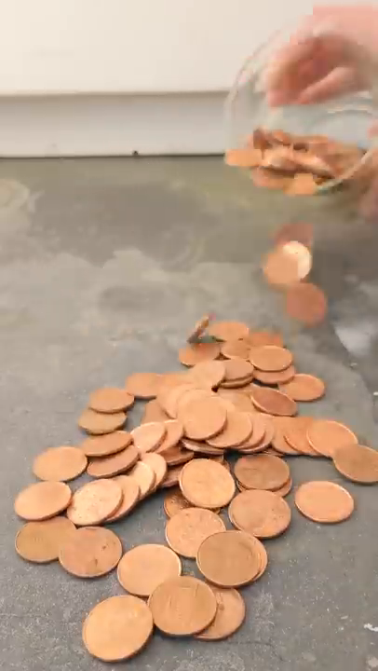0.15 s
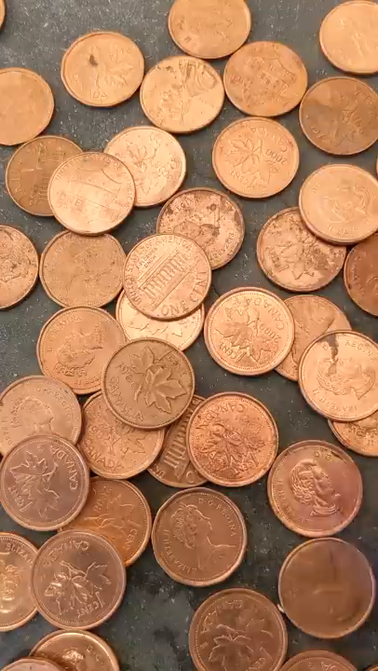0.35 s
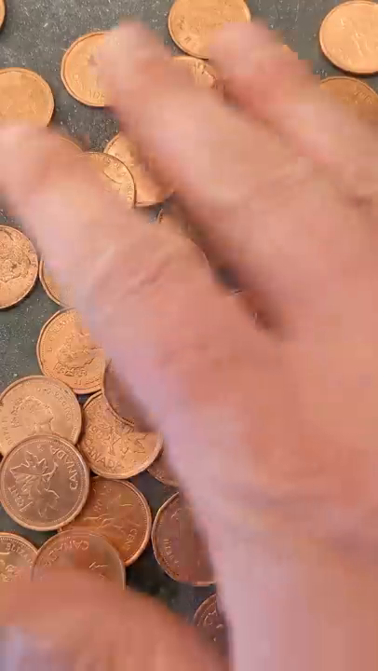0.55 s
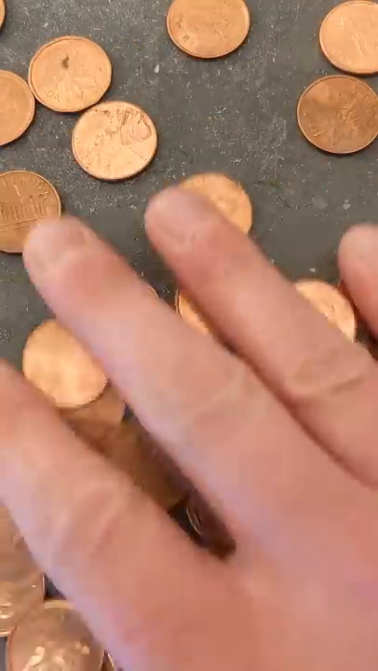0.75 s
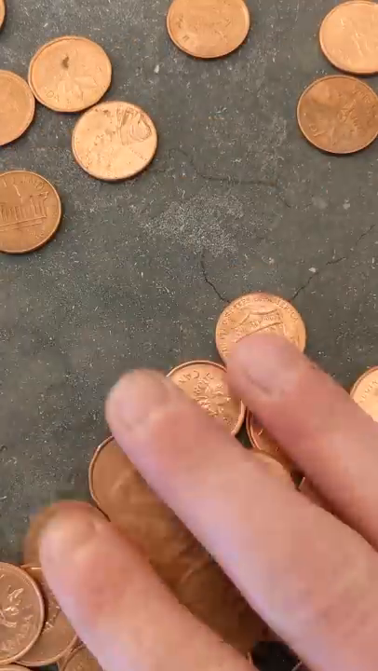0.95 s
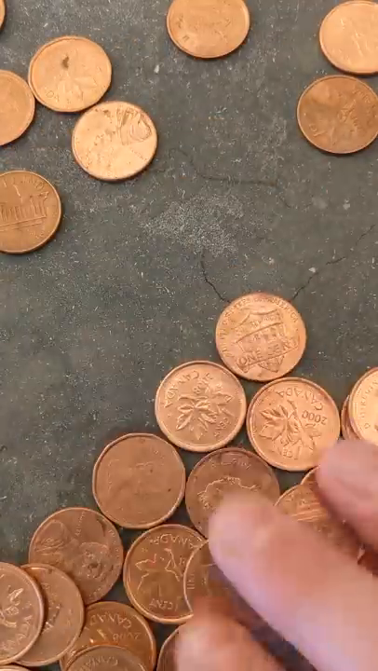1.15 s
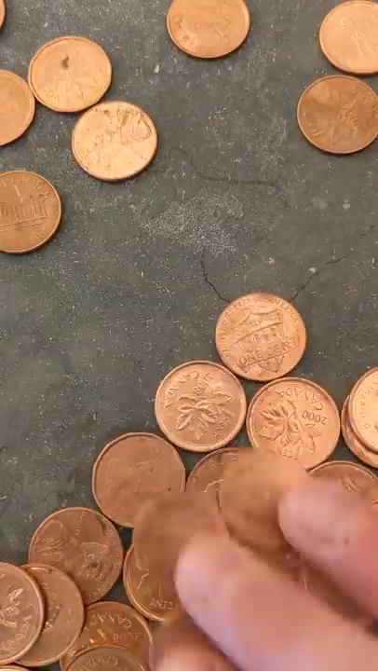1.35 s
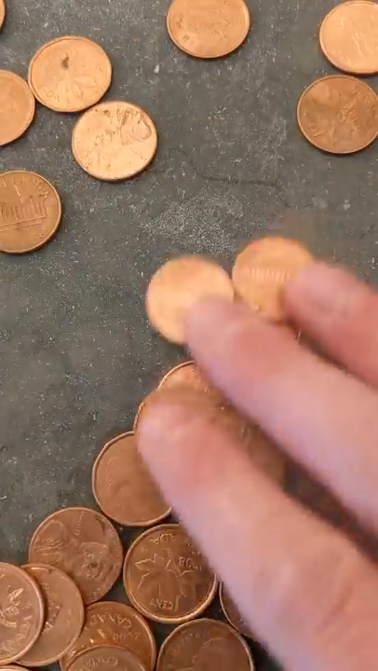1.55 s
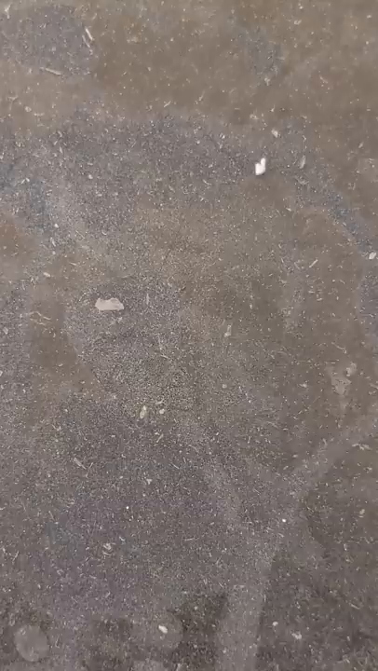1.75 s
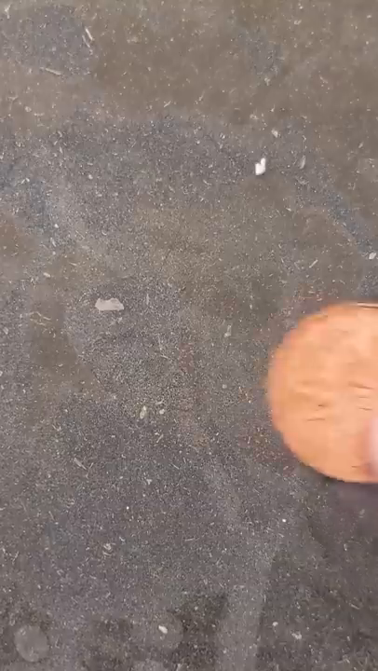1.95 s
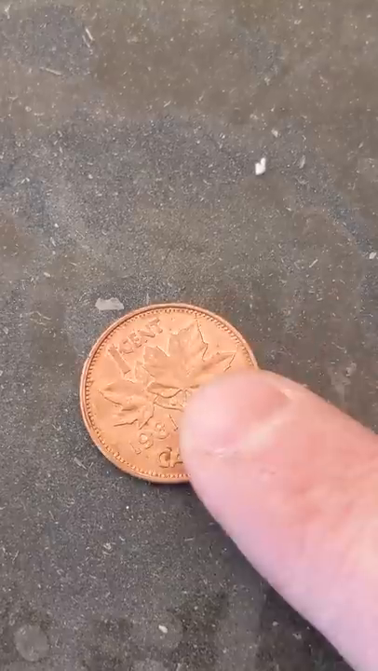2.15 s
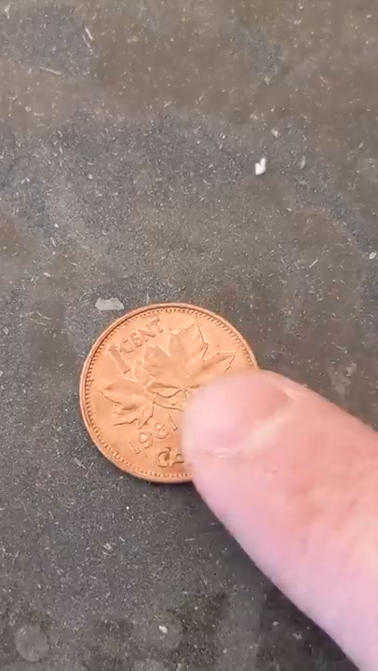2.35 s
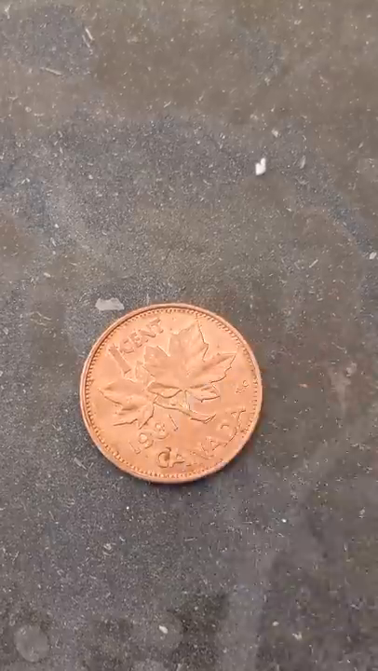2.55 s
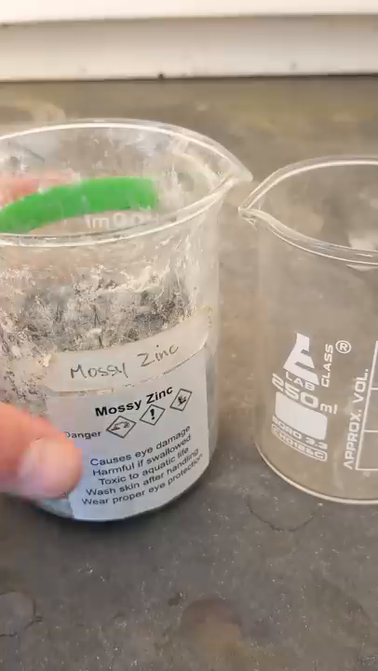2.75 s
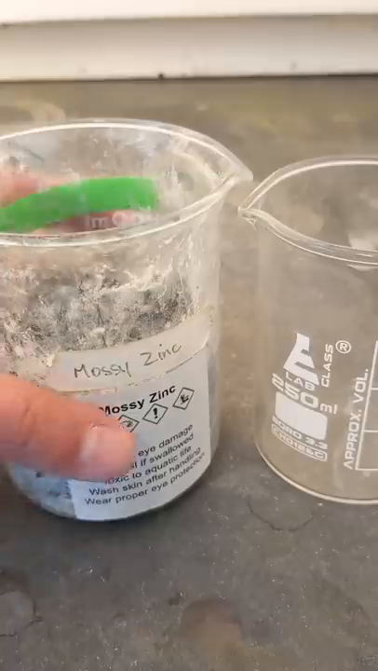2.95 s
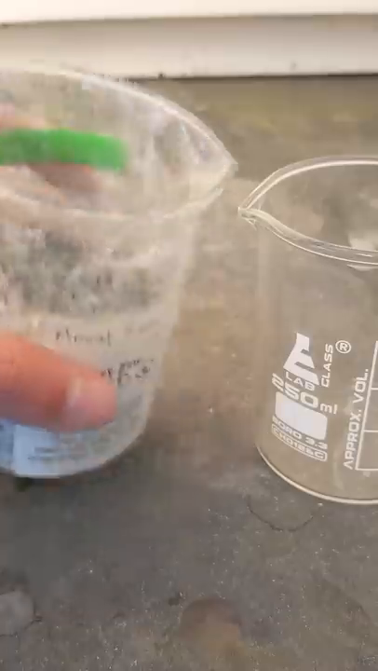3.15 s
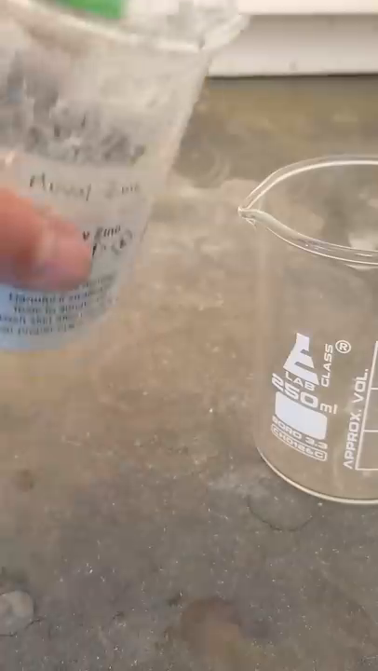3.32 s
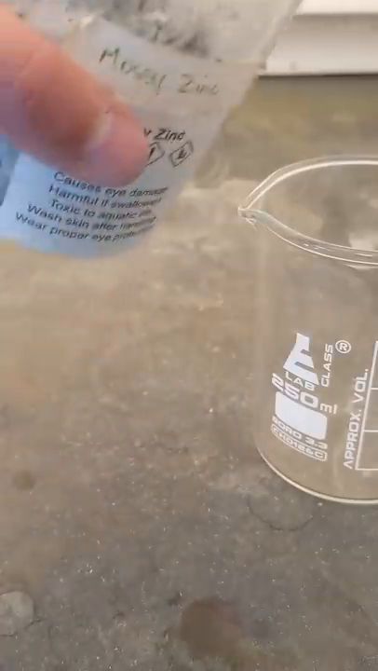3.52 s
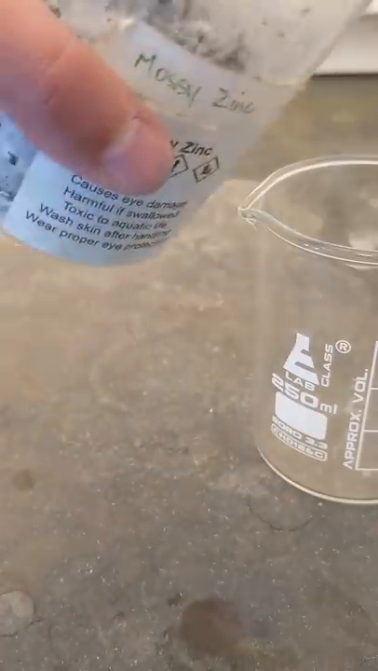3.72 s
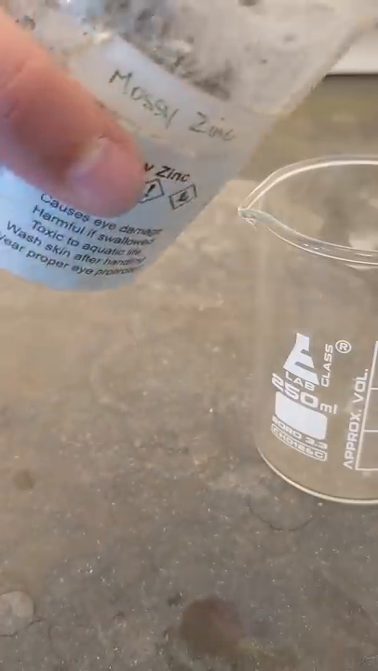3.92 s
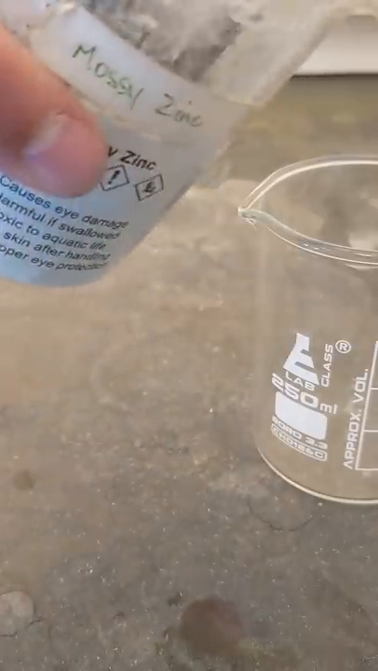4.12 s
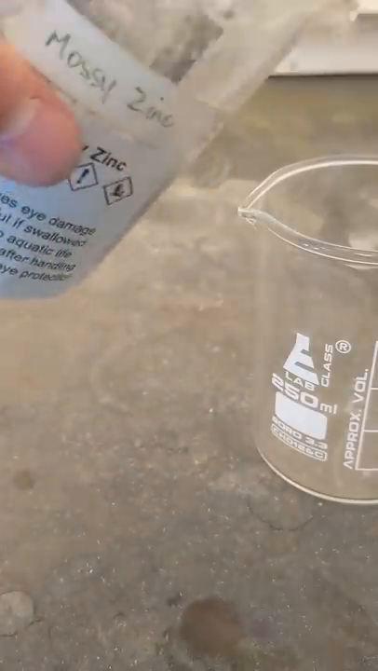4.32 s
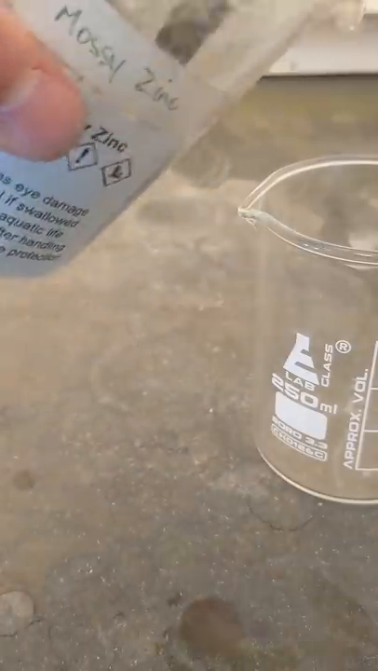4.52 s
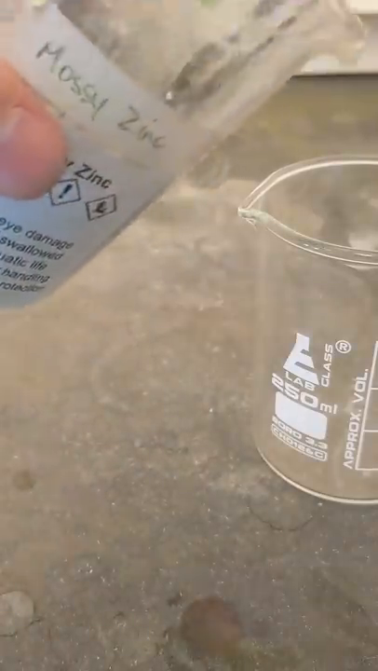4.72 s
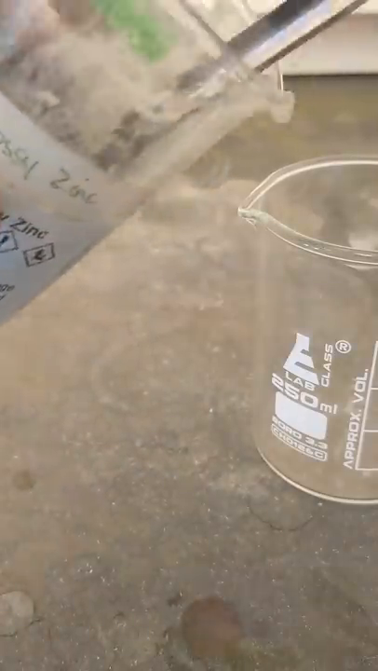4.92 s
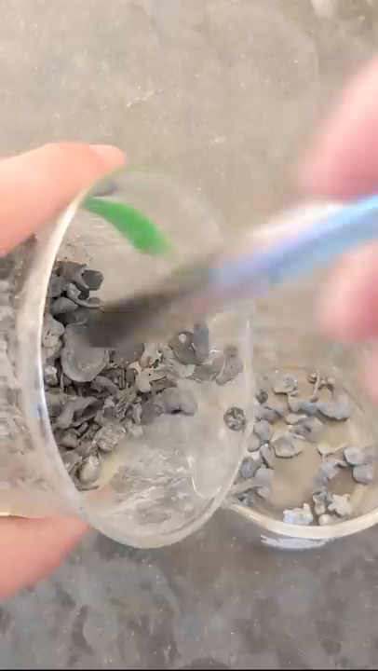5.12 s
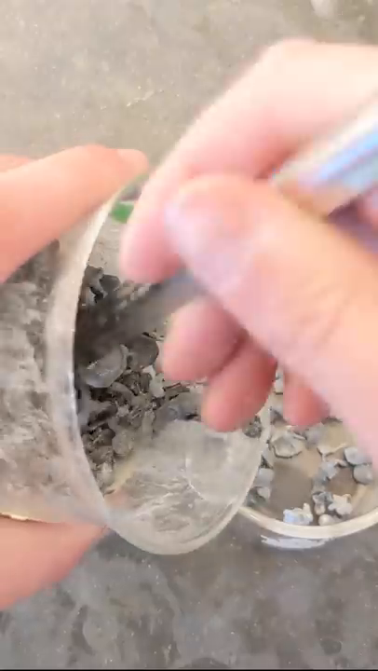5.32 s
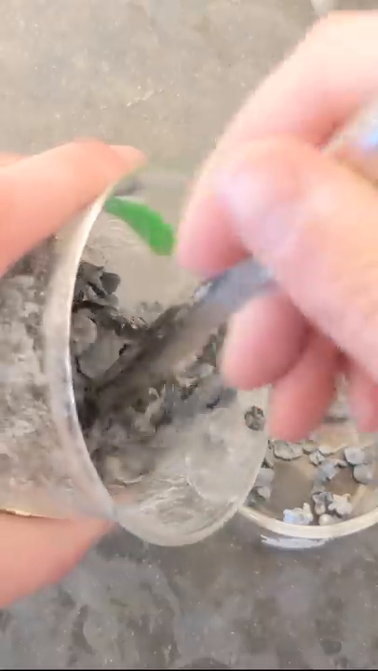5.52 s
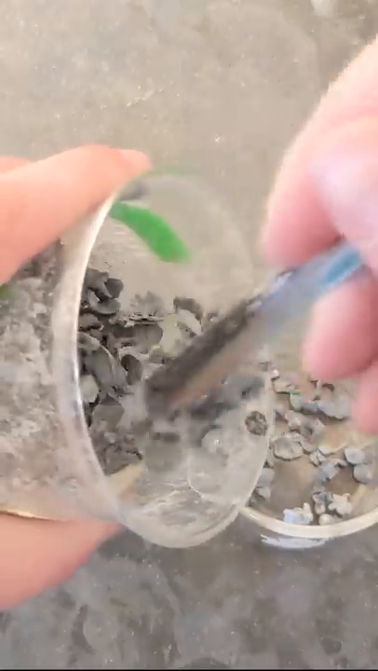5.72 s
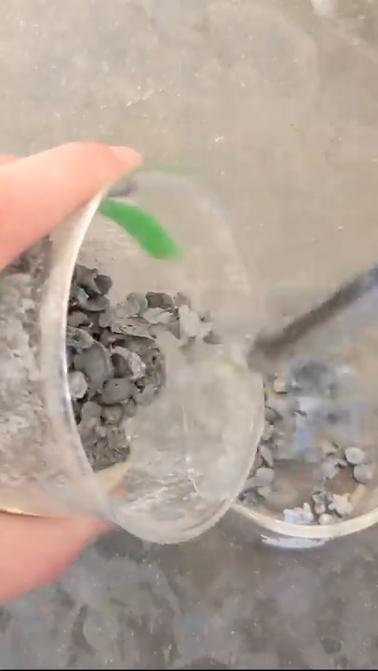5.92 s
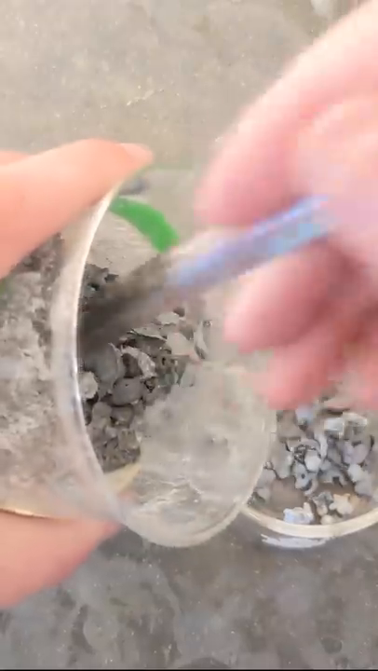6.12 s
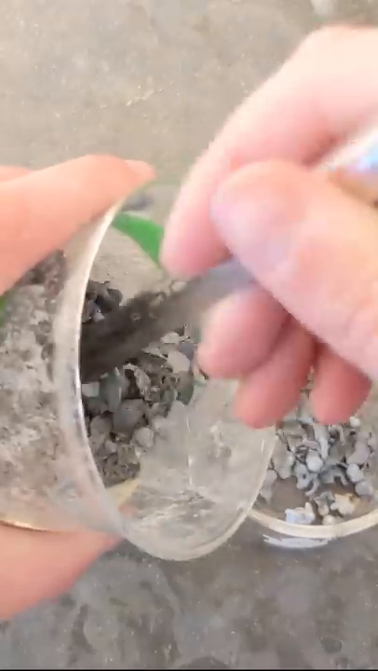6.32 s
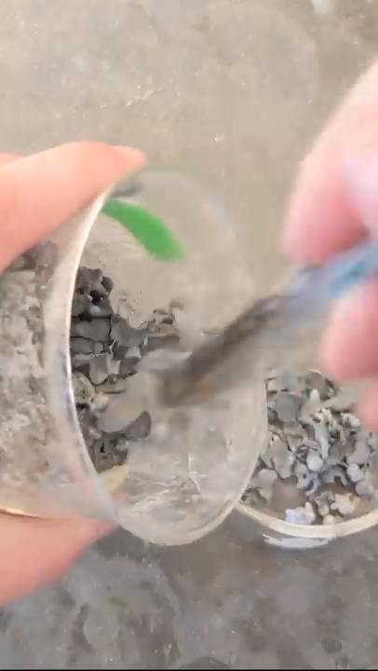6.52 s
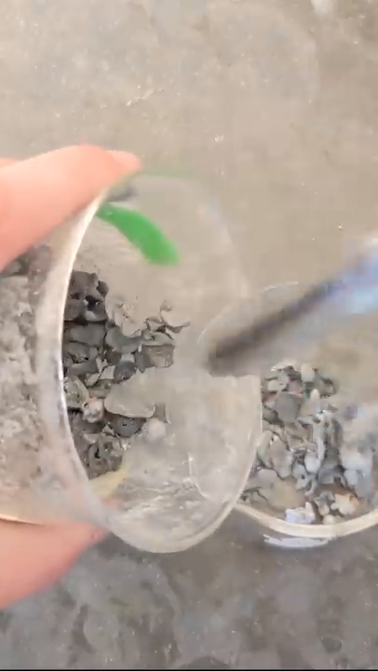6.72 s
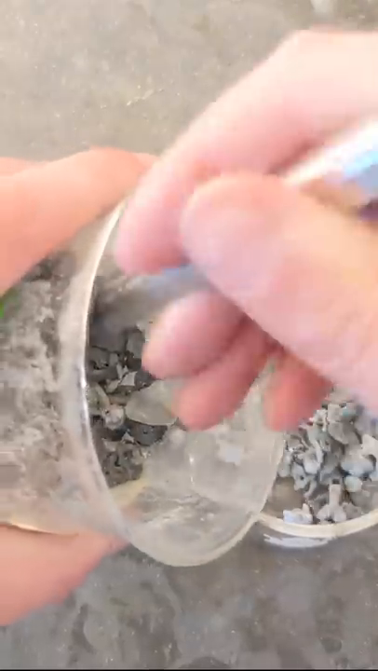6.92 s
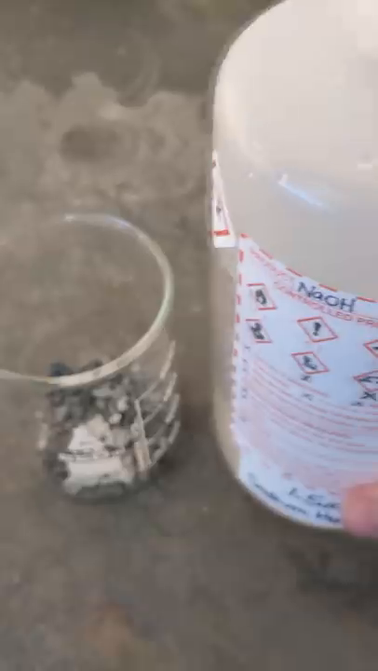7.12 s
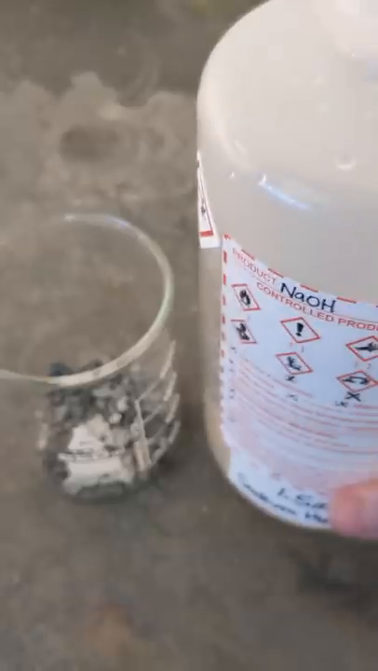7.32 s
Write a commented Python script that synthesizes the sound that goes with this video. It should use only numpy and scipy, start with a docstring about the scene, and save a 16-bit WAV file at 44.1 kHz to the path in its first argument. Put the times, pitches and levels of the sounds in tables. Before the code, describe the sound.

Copper coins spill out of a glass jar onto concrete in a loud, bright jingle, then stop dead. A hand rakes the heap, sweeps back with sharper clinks, and softly slides one coin. A beaker of metal flakes is lifted and tilted with sparse ticks; a spatula then scrapes flakes into a second beaker, which rings brightly. Close stereo microphones, small humming room.

```python
"""Coins and zinc flakes, close up

Copper coins pour from a glass jar onto concrete; a hand rakes and sweeps the heap and slides one coin aside.
A beaker of zinc flakes is lifted and tilted, and a steel spatula scrapes flakes into a second, ringing beaker.
Then fingers touch a plastic bottle. Two close microphones hear it in a small humming room; the heap is silent
for a moment after the pour, and heap and glassware each break off abruptly.
Contacts are bursts and grains of filtered noise; free coins and glass are decaying sines."""
import sys
import numpy as np
from scipy import signal
from scipy.fft import rfft, irfft, next_fast_len
from scipy.io import wavfile
from scipy.ndimage import uniform_filter1d

SR = 44100
rng = np.random.default_rng(int(sys.argv[2]) if len(sys.argv) > 2 else 0)


def generate_wav(sig):
    """Save sig (samples, or channels by samples) to the path in sys.argv[1] as 16-bit PCM at SR."""
    pcm = np.round(np.clip(np.atleast_2d(sig).T, -1, 1) * 32767).astype(np.int16)
    wavfile.write(sys.argv[1], SR, pcm)


N = 329427  # samples

# All table levels are relative: each source trims them further.
# Colour of swept and clinking coins: [f/Hz, density/dB per Hz]
SWEPT = [(1470, -39.5), (2500, -12.5), (4440, -9), (6350, -2), (8870, -1.5), (10200, -6.5), (11700, -11.5),
         (13100, -7), (14900, -10), (16000, -13)]
# Colour of the concrete under the coins: [f/Hz, density/dB per Hz]
CONCRETE = [(110, -36), (180, -10.5), (231, -9.5), (389, -2.5), (435, -8), (600, -4), (705, -5), (1490, -3),
            (1790, -4), (3500, -10), (4550, -38.5), (7700, -120)]
# The spatula taps the wall of the held beaker: [t/s, level/dB]
TAPS = [(5.052, -31), (5.336, -27), (5.604, -29)]


def amp(db):
    """Decibels to gain."""
    return 10 ** (np.asarray(db) / 20)


def unit(x):
    """Scale to rms 1."""
    return x / np.sqrt(np.mean(x ** 2) + 1e-20)


def along(points, hz):
    """(Hz, value) points read on a log frequency axis."""
    f, v = np.transpose(points)
    return np.interp(np.log(hz + 1), np.log(f + 1), v)


def add(track, s, sound):
    """Mix a sound into a track at a time in seconds."""
    start = max(round(s * SR), 0)
    track[..., start:start + sound.shape[-1]] += sound[..., :N - start]


def colour(x, spectrum, size=8192):
    """Causal minimum-phase filter of unit power with the given spectrum."""
    gain = unit(amp(along(spectrum, np.fft.rfftfreq(size, 1 / SR))))
    # folding the cepstrum forward in time puts the response as early as possible
    cepstrum = irfft(np.log(np.maximum(gain, 1e-6)))
    cepstrum[1:size // 2] *= 2
    cepstrum[size // 2 + 1:] = 0
    response = irfft(np.exp(rfft(cepstrum)))
    return signal.fftconvolve(x, response[None], axes=1)[:, :N]


def band(x, hz, sharpness):
    """A resonance applied twice, scaled to keep the energy."""
    b, a = signal.iirpeak(min(hz, SR / 2.2), sharpness, SR)
    y = signal.lfilter(b, a, signal.lfilter(b, a, x))
    return y * np.linalg.norm(x) / np.linalg.norm(y)


def pair(size, apart):
    """Noise for two microphones: a shared part plus a part of their own."""
    shared = rng.standard_normal(size)
    return unit(shared + apart * rng.standard_normal((2, size)))


def sides(db):
    """Left and right gains for a left-minus-right level."""
    return amp([[db / 2], [-db / 2]])


def grains(size, rate, spread_db):
    """Tiny contacts at random times (rate per second), of uneven force; slow swings in power are evened out."""
    struck = rng.random(size) < rate / SR
    force = struck * amp(spread_db * np.minimum(rng.exponential(size=size), 4))
    fade = np.exp(-1 / (0.00042 * SR))  # each contact's power dies away in 0.42 ms
    power = signal.lfilter([1], [1, -fade], force ** 2) + 0.057  # with a steady floor
    slow_power = np.abs(uniform_filter1d(power, SR // 30))
    return np.sqrt(power / slow_power) * pair(size, apart=4)


def room(x, wet_db, shared_hz):
    """Direct sound plus a short tail from the walls; the two close microphones share the bass."""
    # [f/Hz, t60/s]
    wall_decay = [(200, 0.32), (1000, 0.17), (5000, 0.18), (14000, 0.16)]
    hz, t, z = signal.stft(rng.standard_normal((2, SR // 3)), SR, nperseg=256)
    fading = z * amp(-60 * t / along(wall_decay, hz)[:, None])
    tail = signal.istft(fading, SR, nperseg=256)[1]
    tail[:, :SR // 250] = 0  # the walls answer after 4 ms
    echo = signal.fftconvolve(x, tail / np.linalg.norm(tail[0]), axes=1)[:, :N]
    left, right = x + amp(wet_db) * sides(-1) * echo
    side = signal.filtfilt(*signal.butter(1, shared_hz, "high", fs=SR), left - right)
    return np.array([left + right + side, left + right - side]) / 2


def until(s, fade):
    """Gain that falls to nothing at time s, over the last fade seconds."""
    return np.clip((s - np.arange(N) / SR) / fade, 0, 1) ** 2


def decay(t60):
    """Half a second of exponential decay."""
    return amp(-60 * np.arange(SR // 2) / SR / max(t60, .001))


def ring(hz, t60):
    """One struck mode; the higher it is, the more its phase differs between the microphones."""
    t = np.arange(SR // 2) / SR
    phase = rng.random() + min(hz / 12000, .6) * rng.random((2, 1))  # in cycles
    onset = 1 - np.exp(-t / 0.00042)
    return decay(t60) * onset * np.sin(2 * np.pi * (hz * t + phase))


def resonate(x, modes):
    """A glass wall driven by the contacts in x."""
    response = sum(amp(db) * ring(hz, t60) for hz, db, t60 in modes)
    return signal.fftconvolve(x, response, axes=1)[:, :N]


def strokes(rows, attack_s, release_s):
    """Each stroke sets in, holds while its force drifts, and dies away; one gain track per level column."""
    out = np.zeros((len(rows[0]) - 3, N))
    for s, length, rise_db, *column_db in rows:
        t = np.arange(int((length + release_s) * SR)) / SR
        attack = np.minimum(t / attack_s, 1)
        hold_db = rise_db * (np.minimum(t / length, 1) - .5)
        release_db = -60 * np.maximum(t - length, 0) / release_s
        add(out, s, amp(column_db)[:, None] * attack * amp(hold_db + release_db))
    return out


def background():
    """Ventilation rumble is coloured noise, mains and motor hum are sines, a low drone is noise near 80 Hz."""
    # Rumble colour: [f/Hz, density/dB per Hz]
    rumble_colour = [(13, -57), (22, -31.5), (43, -6.5), (122, -6.5), (217, -19), (249, -21), (286, -17),
                     (387, -27), (420, -31), (457, -23), (636, -34.5), (961, -34.5), (1130, -41.5),
                     (8260, -50), (16000, -68)]
    # Mains and motor: [f/Hz, level/dB]
    hum_tones = [(59.2, -53), (118.4, -54.5), (209.9, -77.5)]
    # Drone: [t/s, length/s, rise/dB, level/dB]
    drone_strokes = [(5.05, 1.6, -1, -52.5), (6.66, 0.58, 5, -48)]
    t = np.arange(N) / SR
    rumble = amp(-54) * colour(pair(N, apart=0.4), rumble_colour)
    hum = sum(amp(db) * np.sqrt(2) * np.sin(2 * np.pi * (hz * t + rng.random())) for hz, db in hum_tones)
    swell = strokes(drone_strokes, attack_s=0.05, release_s=.6)
    drone = amp(1) * swell * band(pair(N, apart=0.058), 80, sharpness=6)
    return sides(-1) * (rumble + amp(-3.5) * hum + drone)


def sliding(gains, spectrum, rate, spread_db, clatter_db, grind_db):
    """Coins jostle each other (bright grains) and grind over the concrete (dull grains)."""
    clatter, grind = gains
    bright = colour(clatter * grains(N, rate, spread_db), spectrum)
    dull = colour(grind * grains(N, rate=2500, spread_db=3.5), CONCRETE)
    return amp(clatter_db) * bright + amp(grind_db) * dull


def jingle(rows, lo_hz, hi_hz, t60, count):
    """Tumbling coins ring briefly, each at a pitch of its own, mostly high."""
    out = np.zeros((2, N))
    span = [rows[0][0], rows[-1][0] + rows[-1][1]]
    for when, pitch, size in rng.random((count, 3)):
        hz = lo_hz * (hi_hz / lo_hz) ** np.sqrt(pitch)
        add(out, np.interp(when, [0, 1], span), amp(-12 * size) * ring(hz, t60))
    return out


def pour():
    """Coins tumble out in grains and short rings, and weakly drive the modes of the glass jar."""
    # [t/s, length/s, rise/dB, clatter level/dB, grind level/dB]
    pour_strokes = [(-0.01, .235, -8, -23.5, -32), (.236, .05, -17.5, -25.5, -29)]
    # [f/Hz, density/dB per Hz]
    pour_colour = [(1470, -36.5), (2500, -12.5), (2700, -11), (4410, -1), (4910, -2), (11400, -0.5),
                   (13100, -6.5), (14200, -1), (16000, -18.5)]
    # Jar modes: [f/Hz, level/dB, t60/s]
    jar_modes = [(6303, -1, .12), (7892, 0.5, .12), (10072, 1.5, .1)]
    flow = strokes(pour_strokes, attack_s=.004, release_s=.06)
    out = sliding(flow, pour_colour, rate=700, spread_db=-1.0, clatter_db=-2.5, grind_db=1.0)
    out += amp(-2.5) * flow[0] * jingle(pour_strokes, lo_hz=1302, hi_hz=14640, t60=0.024, count=90)
    return out + amp(-40.5) * resonate(out, jar_modes)


def coin_hits():
    """Heaped coins damp each other to sharp ticks; a free one rings at its lowest plate mode."""
    # Coin on coin: [t/s, peak level/dB]
    clinks = [(0.0329, -14), (0.0747, -8.5), (0.099, -13), (0.2403, -11), (0.2429, -6.5), (0.2503, -14.5),
              (0.6787, -32), (0.7048, -25.5), (0.781, -20), (0.9175, -33), (1.0514, -18), (1.067, -14.5),
              (1.0933, -20.5), (1.13, -23), (1.1732, -17.5), (1.244, -19.5), (1.3027, -25), (1.3347, -22.5),
              (1.4098, -16.5), (1.4372, -19.5), (1.459, -12), (1.473, -7.5), (1.496, -20), (1.532, -13),
              (1.5707, -8.5), (1.6327, -12), (1.666, -9), (1.7166, -17), (1.7418, -10.5), (1.772, -17.5)]
    # Coins that ring freely: [t/s, peak level/dB, f/Hz]
    free_coins = [(0.0716, -13, 14440), (0.0964, -11.5, 13000), (0.1348, -18, 14600), (0.1545, -14, 14320),
                  (0.1758, -18, 13600), (0.1915, -13, 14730), (0.2128, -25.5, 14940),
                  (0.9182, -27.5, 14330), (0.943, -37, 14000), (1.023, -32, 14000), (1.241, -31, 13100),
                  (1.718, -30, 12500), (1.7719, -30, 12800)]
    ticks, knocks, pings = np.zeros((3, 2, N))
    for s, db in clinks:
        add(ticks, s, amp(db - 5.5) * sides(-4.5) * decay(0.012) * pair(SR // 2, apart=3))
        add(knocks, s, amp(db - 29.5) * decay(0.013) * pair(SR // 2, apart=0.45))  # the floor answers
    for s, db, hz in free_coins:
        # the embossing splits the mode
        split = ring(hz, t60=0.087) + 0.3 * ring(hz + 70, t60=.08)
        add(pings, s, amp(db - 4.0) * split)
    return colour(ticks, SWEPT) + colour(knocks, CONCRETE) + pings


def rake():
    """A hand pulls through the heap: grains of clatter and many short rings."""
    # [t/s, length/s, rise/dB, clatter level/dB, grind level/dB]
    rake_strokes = [(.69, 0.26, -0.5, -29.5, -40), (.96, .32, -7, -41, -48)]
    # [f/Hz, density/dB per Hz]
    rake_colour = [(1470, -31), (2500, -14.5), (2900, -9), (3950, -7.5), (5110, -5), (6550, -3.5),
                   (11600, -7.5), (14800, -9), (16000, -11.5)]
    pull = strokes(rake_strokes, attack_s=0.024, release_s=0.15)
    out = sliding(pull, rake_colour, rate=800, spread_db=0.5, clatter_db=-3.5, grind_db=0)
    return out + amp(1.5) * pull[0] * jingle(rake_strokes, lo_hz=1980, hi_hz=14260, t60=0.014, count=300)


def sweep():
    """The hand sweeps back through the coins: grains of clatter and higher short rings."""
    # [t/s, length/s, rise/dB, clatter level/dB, grind level/dB]
    sweep_strokes = [(1.325, .125, 1, -46.5, -48.5), (1.45, 0.33, 1.5, -31.5, -40.5)]
    push = strokes(sweep_strokes, attack_s=0.005, release_s=0.11)
    out = sliding(push, SWEPT, rate=530, spread_db=2.5, clatter_db=-2.0, grind_db=-1.5)
    return out + amp(6) * push[0] * jingle(sweep_strokes, lo_hz=5000, hi_hz=10910, t60=0.023, count=250)


def slide():
    """One coin slides aside: dense grains of contact, without rings."""
    # [t/s, length/s, rise/dB, clatter level/dB, grind level/dB]
    slide_strokes = [(1.895, 0.15, 12, -65, -73), (2.06, .135, 2.7, -56, -63.5)]
    # [f/Hz, density/dB per Hz]
    slide_colour = [(1470, -39), (2500, -20), (4730, -4.5), (5310, -1.5), (7710, 5), (9440, -10.5),
                    (14900, -15), (16000, -19.5)]
    push = strokes(slide_strokes, attack_s=0.0071, release_s=0.15)
    return sliding(push, slide_colour, rate=3400, spread_db=4.5, clatter_db=-1.5, grind_db=3.5)


def coins():
    """The heap and its hits, cut to two spans, then the single coin, each in the room."""
    dry_heap = coin_hits() + sides(-2.0) * (pour() + rake()) + sides(-1.7) * sweep()
    heap = room(dry_heap, wet_db=-5.5, shared_hz=400)
    heard = until(.297, .012) + until(1.825, .025) - until(.676, .002)  # silent from .297 to .674 s
    return heard * heap + room(slide(), wet_db=-3.5, shared_hz=400)


def bumps():
    """A vessel held in the hand gives a damped, hollow knock: decaying noise in a broad band."""
    # [t/s, level/dB, centre f/Hz, t60/s, left minus right/dB]
    dull_knocks = [(0.064, -21.5, 158, 0.049, -13), (0.077, -23.5, 62.1, .12, -9.5),
                   (0.0754, -18.5, 147, 0.06, -11), (0.077, -24, 520, 0.1, 2.5),
                   (0.24, -39, 812, 0.04, 2.5), (2.818, -40.5, 740, 0.1, 8), (3.035, -53, 583, 0.11, 6),
                   (3.135, -44, 830, 0.089, 10), (3.185, -44.5, 280, 0.35, 5), (4.595, -36, 210, 0.09, 3),
                   (5.85, -37.5, 436, 0.098, -1), (6.03, -31, 740, 0.13, 4.5), (6.368, -28, 328, 0.23, 2),
                   (6.369, -33.5, 1190, 0.11, 6.5), (6.825, -36.5, 744, 0.42, 4),
                   (7.17, -41.5, 131, 0.44, 1)]
    out = np.zeros((2, N))
    for s, db, hz, t60, pan_db in dull_knocks:
        knock = decay(t60) * band(pair(SR // 2, apart=.35), hz, sharpness=1.3)
        add(out, s, amp(db) * sides(pan_db) * knock)
    return out


def zinc_hits():
    """Flakes and spatula hit the glass and rattle to rest; gives tumbling, scooped, knock and note tracks."""
    # [t/s, peak level/dB, low knock/dB, left minus right/dB, rattle after it/dB, f/Hz]
    chinks = [(2.8194, -23.5, -14, -1.5, -14, 6000), (2.9124, -49.5, -6, 0, 2, 3960),
              (3.3204, -50.5, -37, -2, -0.5, 4390), (3.6148, -31, -10.5, -5, -42, 5480),
              (3.6622, -14, -22.5, -4, -33, 5600), (3.9618, -40, -36, -7, -12, 6660),
              (4.1073, -30, -18, -9, -9.5, 6850), (4.1296, -29, -5.5, -0.5, -18.5, 4000),
              (4.2284, -50.5, -4, -4, -14, 3140), (4.335, -40, -10, -10, -22, 6030),
              (4.464, -15.5, -10.5, -5, -15.5, 3190), (4.5026, -11.5, -39, -7, -20, 8500),
              (4.58, -24, -9, -6.5, -4, 6220), (4.6159, -17, -37, -9, -30, 7700),
              (4.6613, -18, -32, -5.5, -22, 5840), (4.7169, -23.5, -19, -6, -1.5, 3220),
              (5.0515, -15, -18.5, 1, -6, 8000), (5.0834, -15, -22, 0, -12.5, 8200),
              (5.1663, -22.5, -32, -1, -21, 11000), (5.335, -10, -26, -3, -5.5, 5140),
              (5.4201, -16, -27, -2.5, -29, 7500), (5.465, -25, -24, -2, -8, 5450),
              (5.5475, -24.5, -13, 5, -18, 5330), (5.5588, -21.5, -12, -14, -23, 7040),
              (5.6022, -10, -17, -3, -3.5, 5250), (5.954, -16, -31, -7, -11, 7900),
              (6.0167, -18.5, -30, -7, -3, 6400), (6.0282, -3, -13, -1.5, -9, 6700),
              (6.0683, -8.5, -25, -3, -4, 5200), (6.088, -3.5, -38, 3, -12, 8100),
              (6.1024, -3.5, -43, 3, -10, 8600), (6.126, -8, -15.5, 7.5, -6.5, 6600),
              (6.1421, -6, -20, -7.5, -21.5, 5400), (6.1584, -12, -12.5, 6, -24, 6750),
              (6.192, -17.5, -35, -0.5, -9, 5500), (6.3004, -16.5, -12, -3, -16, 7940),
              (6.339, -17.5, -26.5, -0.5, -16, 7160), (6.3694, -22, -1, -9.5, -5.5, 4050),
              (6.39, -13.5, -31, -2.5, -13, 8800), (6.5037, -15.5, -8, -3, -1.5, 8570),
              (6.5718, -3.5, -18.5, 1, -18.5, 8400), (6.6379, -0.5, -16, -2, -33, 8770),
              (6.6983, -14, -14.5, 1, -14.5, 8340), (6.7259, -8, -35, -0.5, -4, 6850),
              (6.792, -3, -25, -3.5, -20, 5530), (6.8211, -12, -40, 12.5, -12, 3940),
              (6.8784, -11.5, -35.5, 1, -12, 6660), (7.0322, -24, -7.5, -2.5, -4.5, 7760),
              (7.083, -31, -18, 2, -23, 3180), (7.1046, -23, -7.5, -0.5, -17, 5870)]
    tumbling, scooped, knocks, notes = np.zeros((4, 2, N))
    for s, db, knock_db, pan_db, rattle_db, hz in chinks:
        blow = decay(.012) * pair(SR // 2, apart=4)
        rattle = amp(rattle_db) * decay(0.16) * grains(SR // 2, rate=700, spread_db=1.5)
        hit = amp(db - 7.5) * sides(pan_db) * (blow + amp(0.5) * rattle)
        # flakes deep in the beaker, before the spatula taps, sound duller
        add(tumbling if s < TAPS[0][0] - .1 else scooped, s, hit)
        add(notes, s, amp(-5.5) * band(hit, hz, sharpness=14.0))  # each piece has its own brief pitch
        add(knocks, s, amp(knock_db + 5) * hit)
    return tumbling, scooped, knocks, notes


def zinc():
    """Flakes slide as the beaker tilts, then under the spatula; glass wall, body and air inside answer them."""
    # [t/s, length/s, rise/dB, crackle level/dB, beaker body level/dB, air resonance level/dB]
    scrapes = [(2.76, 0.044, 12, -70, -73, -78), (3.79, 0.17, 4, -72.5, -82, -88),
               (4.118, 0.022, -4, -63.5, -56.5, -55.5), (4.32, 0.047, -5.5, -71.5, -73, -51),
               (4.415, .05, 2, -69, -63.5, -56), (4.49, 0.12, 4.5, -48, -56.5, -38.5),
               (4.72, 0.043, -10.5, -56, -46.5, -51), (4.85, 0.047, -2, -66.5, -63, -54),
               (4.955, 0.073, -5, -75.5, -70, -54), (5.34, 0.17, -26.5, -60, -54, -48),
               (5.555, 0.35, -5.5, -48.5, -47, -41.5), (5.885, 0.086, 2, -45, -50, -62),
               (6.025, 0.11, -4.5, -39.5, -46, -28.5), (6.17, 0.11, -11, -55, -55, -47.5),
               (6.285, 0.48, -3, -56.5, -58, -49.5), (6.495, .21, -13, -44, -48, -39.5),
               (6.725, 0.15, 4.5, -41.5, -49, -36.5), (7.035, 0.086, -6, -68, -56, -42.5)]
    # Colours of flakes in the tilted beaker, scooped zinc, scraped flakes, beaker body: [f/Hz, density/dB per Hz]
    tilted_colour = [(1350, -11.5), (2300, -4.5), (2470, -10), (2710, -46), (3010, 1.5), (3740, -10),
                     (4300, 2), (4970, -1.5), (5440, 4), (6290, -1.5), (8360, 1.5), (9290, -7), (11200, -8),
                     (13300, -11), (16000, -21)]
    scooped_colour = [(2000, -37), (3400, -15.5), (3600, -24.5), (3700, -13), (3920, -4.5), (4100, -6.5),
                      (5180, 1), (6130, -2), (6290, -1), (6540, -2), (6940, -3.5), (8100, 2), (10500, -9.5),
                      (13300, -4.5), (16000, -12.5)]
    flake_colour = [(2000, -46.5), (3400, -15), (3670, -24), (4320, -1.5), (7030, 2.5), (8370, 1.5),
                    (9280, -5.5), (11200, -4.5), (15300, -12.5), (16000, -17)]
    body_colour = [(140, -49.5), (230, -20.5), (305, -7), (404, -14.5), (535, -12), (588, -17.5),
                   (638, -4.5), (710, -10.5), (807, -2), (940, -12.5), (1470, -13), (1770, -16), (3010, -9),
                   (3540, -12.5), (3800, -11.5), (4940, -31.5), (8360, -120)]
    # Wall of the loaded beaker: [f/Hz, level/dB, t60/s]
    wall_modes = [(2720, -18, 0.19), (3070, 14, 0.062), (5453, -1, 0.2), (7750, -16, 0.091),
                  (8300, -23, .15)]
    tumbling, scooped, knocks, notes = zinc_hits()
    # flakes start at once and take a moment to settle
    crackle, body, cavity = strokes(scrapes, attack_s=0.004, release_s=0.22)
    scrape = amp(6.0) * colour(crackle * grains(N, rate=470, spread_db=0.5), flake_colour)
    hollow = colour(knocks + amp(4.5) * body * grains(N, rate=2200, spread_db=6.0), body_colour)
    air = amp(-7.5) * band(cavity * grains(N, rate=300, spread_db=8.5), 788, sharpness=10)
    wall = amp(-45) * resonate(tumbling, wall_modes)
    hits = colour(tumbling, tilted_colour) + wall + colour(scooped, scooped_colour) + notes
    return hits + sides(-1) * scrape + hollow + air


def handling():
    """The beaker's base scuffs as it is lifted and fingers brush the bottle: grains of coloured noise."""
    # Scuff, then fingers on plastic: [t/s, length/s, rise/dB, level/dB]
    scuff_strokes = [(3.02, .08, -10, -57.5), (3.11, .045, 4.5, -47)]
    brush_strokes = [(7.13, .14, -8.5, -59.5)]
    # Their colours: [f/Hz, density/dB per Hz]
    drag_colour = [(120, -47), (200, -5.5), (383, -2.5), (687, -22), (858, -7), (1540, -31), (1670, -26.5),
                   (3150, -40.5), (11000, -39), (12000, -37), (15600, -65), (22000, -120)]
    plastic_colour = [(290, -16), (500, -3.5), (1220, -14.5), (1460, -15), (1610, -14.5), (3190, -18),
                      (14000, -42.5)]
    drag = strokes(scuff_strokes, attack_s=0.0058, release_s=.2)
    scuff = amp(3.0) * colour(drag * grains(N, rate=580, spread_db=1.0), drag_colour)
    touch = strokes(brush_strokes, attack_s=0.0058, release_s=0.34)
    brush = amp(0.5) * colour(touch * grains(N, rate=3000, spread_db=4.5), plastic_colour)
    return room(scuff + brush, wet_db=-0.5, shared_hz=450)


def held_beaker():
    """The spatula rings the held beaker, damped by the fingers, as a sum of struck modes."""
    # [f/Hz, level/dB, t60/s]
    held_modes = [(1440, -32.5, 0.95), (4860, 1.5, 0.095), (5500, -11, 0.38), (5400, -12, 0.31),
                  (7360, -10, 0.12), (8140, 1, 0.11), (10800, -18, 0.28)]
    out = np.zeros((2, N))
    for s, db in TAPS:
        add(out, s, sum(amp(db + level) * ring(hz, t60) for hz, level, t60 in held_modes))
    return out


def lower_beaker():
    """Falling pieces ring the lower beaker; harder contacts favour high modes, bouncing flakes roughen them."""
    # [f/Hz, level/dB, t60/s]
    glass_modes = [(1409, -11, 1.2), (3800, 1.5, .26), (4995, -17, .2), (5168, -16, .2), (6490, -10, .2),
                   (6514, -7, .3), (7069, -16, .24), (7787, -5, .19), (7848, -16, .16), (8403, -20, .17),
                   (8592, -17, .28), (11000, -30, .22), (12403, -21, .16), (12918, -23, .16),
                   (13152, -23, .16), (15380, -32, .16)]
    # Blows: [t/s, level/dB, hardness/dB per octave]
    blows = [(6.023, -23, 0.5), (6.086, -37, -11), (6.128, -31.5, 15.5), (6.367, -35, 1.5),
             (6.726, -19.5, 4), (6.792, -32, 14.5), (6.831, -20, 9), (6.841, -22, 8.5),
             (6.892, -42.5, 19.5)]
    out, t = np.zeros((2, N)), np.arange(N) / SR
    knots = np.linspace(0, t[-1], 400)
    for hz, level, t60 in glass_modes:
        octaves = np.log2(hz / glass_modes[1][0])
        energy = np.zeros(N)  # every blow tops up what the mode still holds
        for s, db, hardness_db in blows:
            add(energy, s, (amp(db + level + hardness_db * octaves) * decay(t60)) ** 2)
        lead = rng.uniform(.15, .32)  # phase of left ahead of right, in cycles
        # flakes nudge the timing by some 16 microseconds, which disturbs high modes most
        jostle = np.interp(t, knots, 1.6e-5 * rng.standard_normal(len(knots)))
        tone = np.sin(2 * np.pi * (hz * (t + jostle) + np.array([[lead], [0]])))
        out += uniform_filter1d(np.sqrt(energy), size=60) * tone
    return out


def scene():
    """Coins first, then the glassware, over the room's hum."""
    ringing = amp(0.5) * sides(0.96) * (held_beaker() + lower_beaker())
    glassware = room(zinc(), wet_db=-5.5, shared_hz=420) + ringing
    heard = until(7.122, .006)  # the glassware breaks off
    knocks = room(bumps(), wet_db=-8.5, shared_hz=30)
    return background() + coins() + knocks + heard * glassware + handling()


def record(dry):
    """The treble rolls off over 600 Hz around 16150 Hz, with nothing kept above; peaks clip at full scale."""
    size = next_fast_len(N + SR // 2)
    passed = np.clip((16150 - np.fft.rfftfreq(size, 1 / SR)) / 600 + .5, 0, 1)
    return np.clip(irfft(rfft(dry, size) * passed ** 2, size)[:, :N], -1, 1)


dry = scene()
out = record(dry)
generate_wav(out)
```